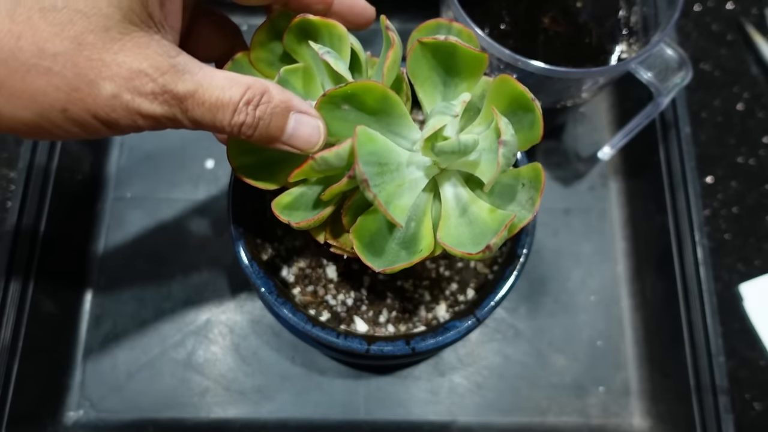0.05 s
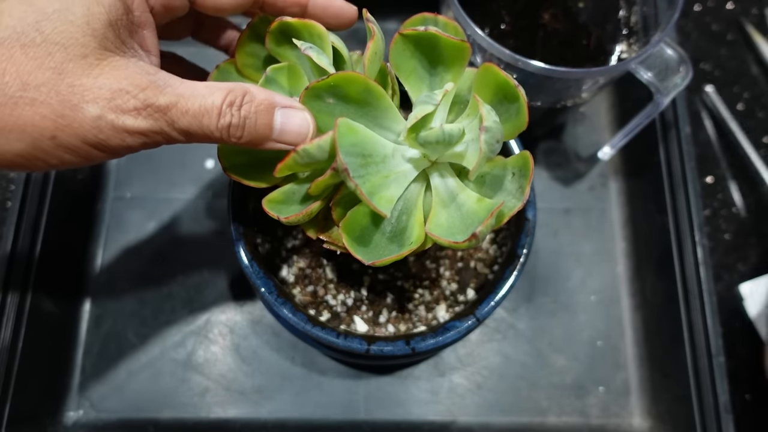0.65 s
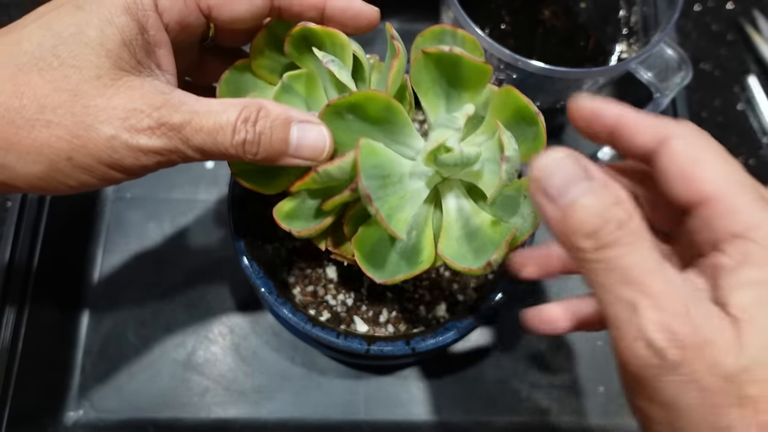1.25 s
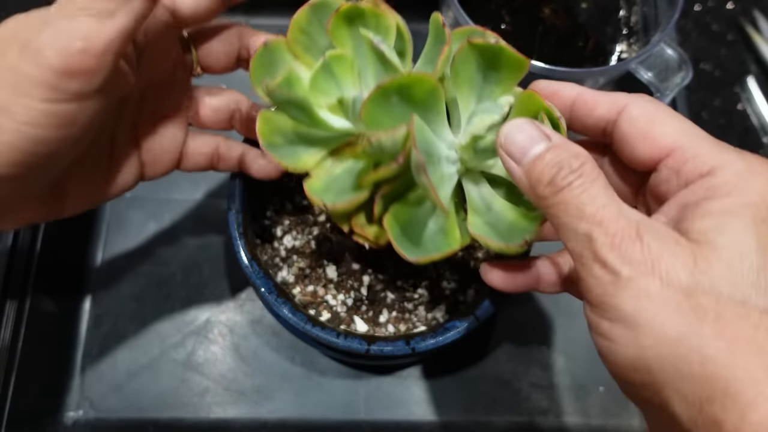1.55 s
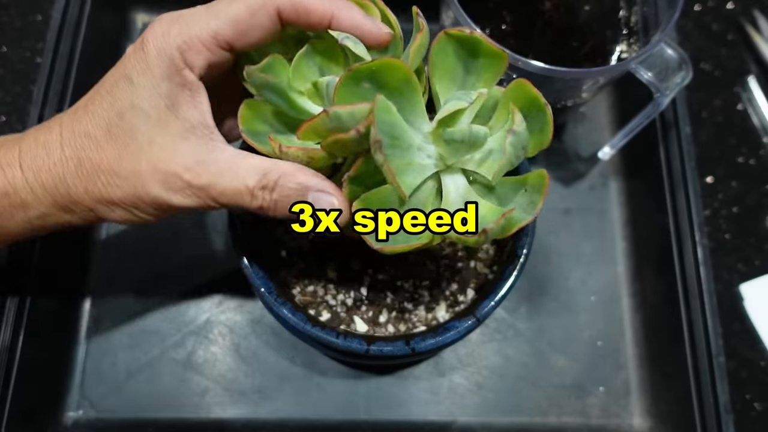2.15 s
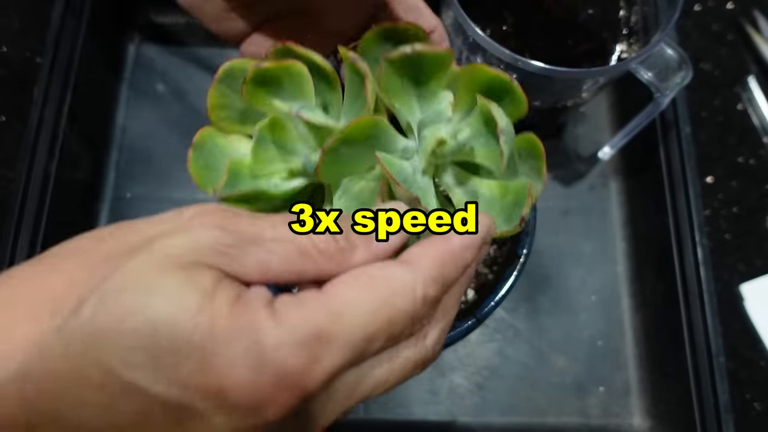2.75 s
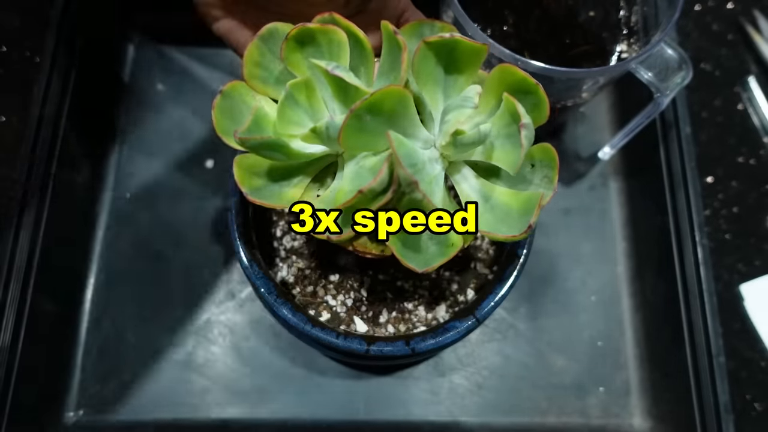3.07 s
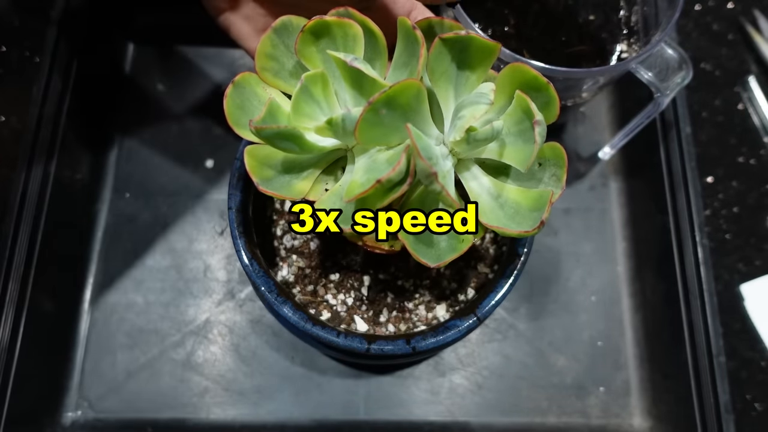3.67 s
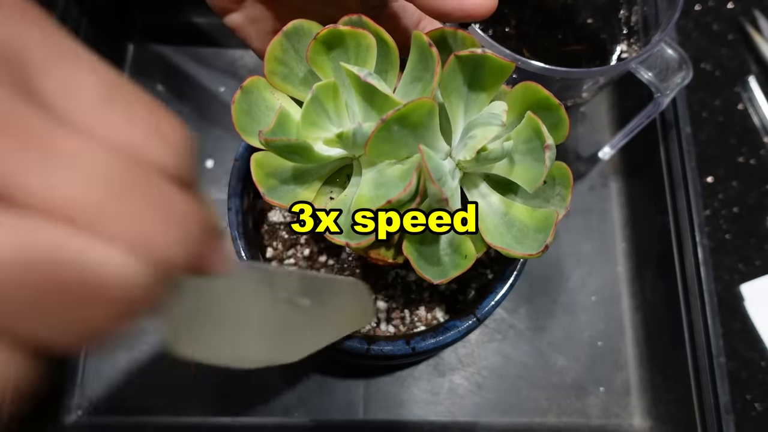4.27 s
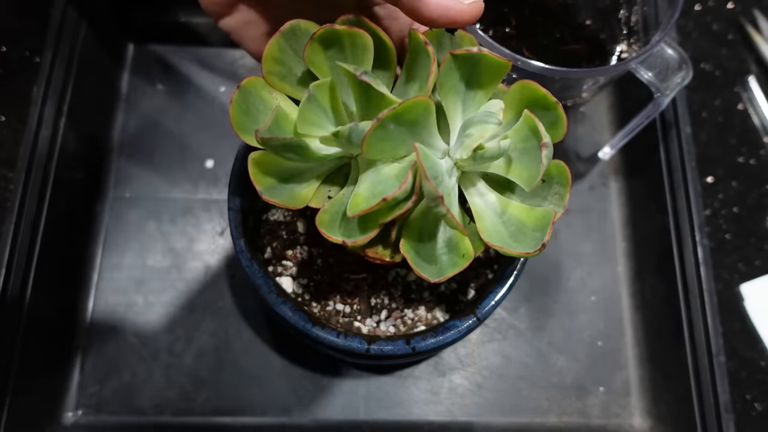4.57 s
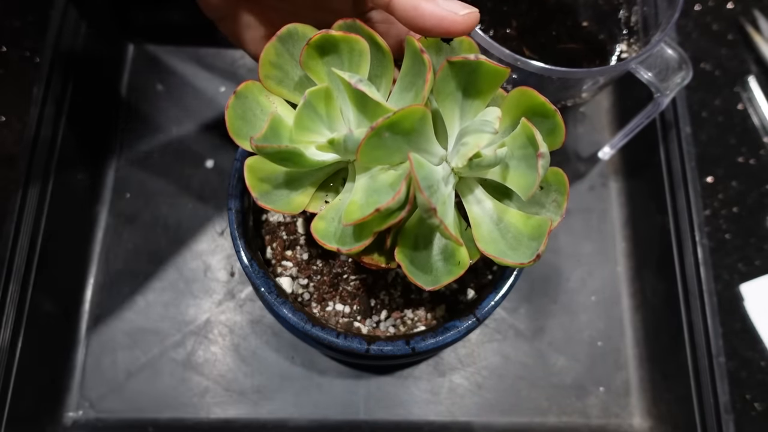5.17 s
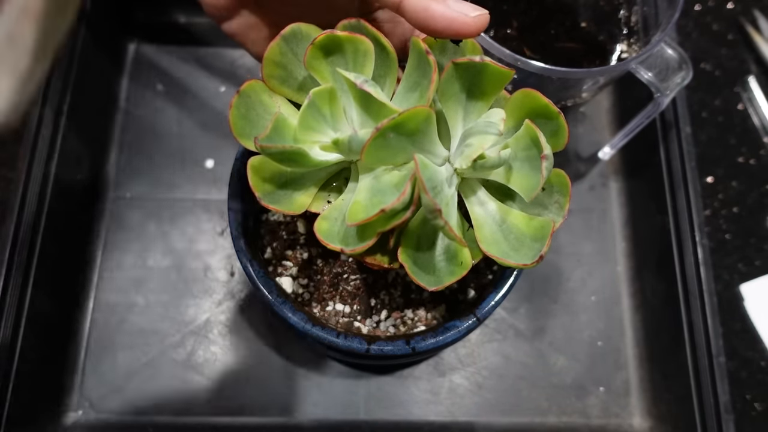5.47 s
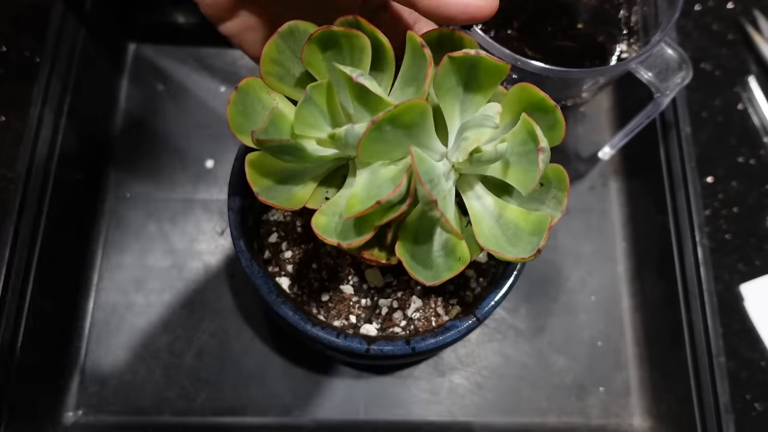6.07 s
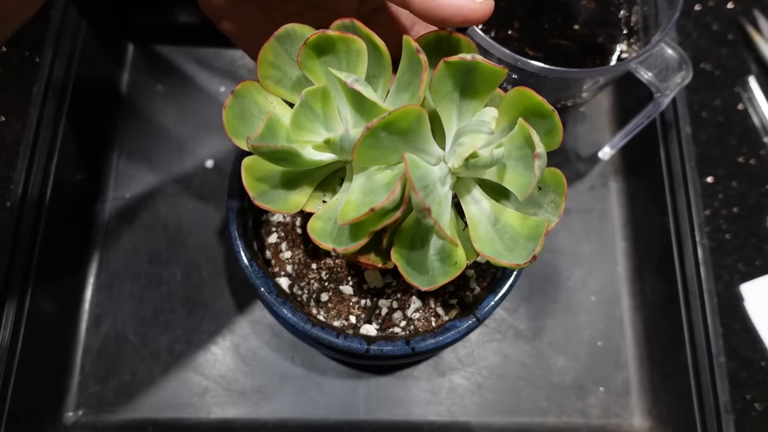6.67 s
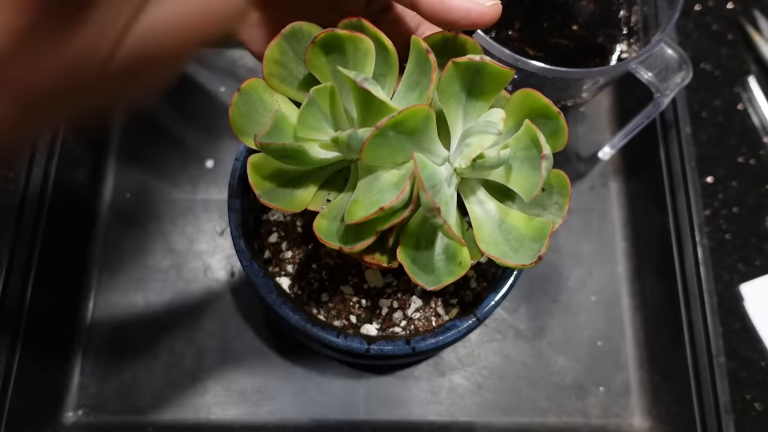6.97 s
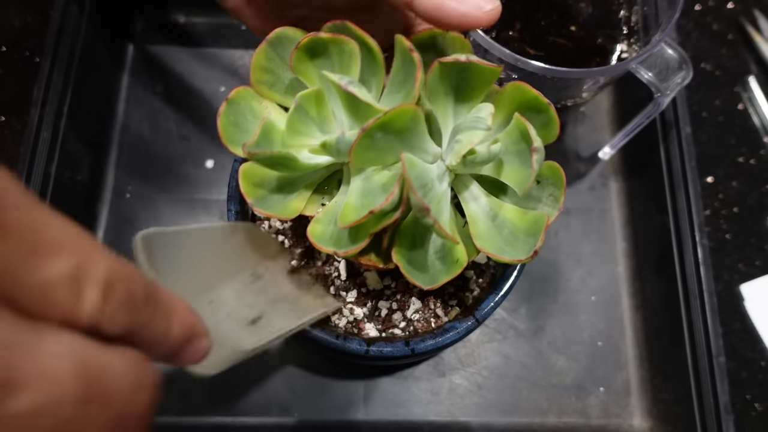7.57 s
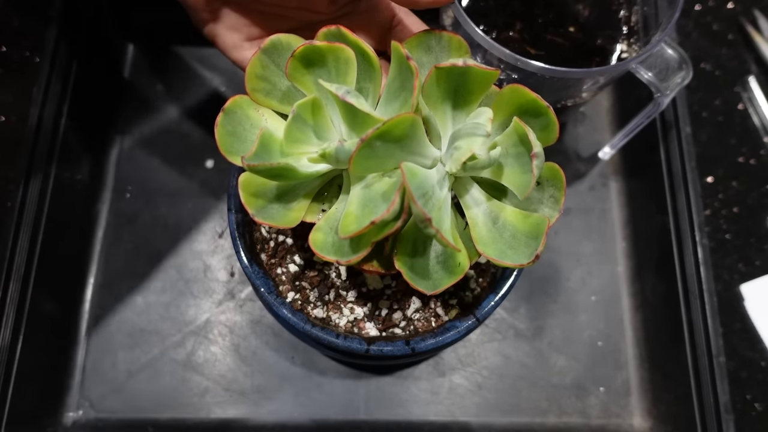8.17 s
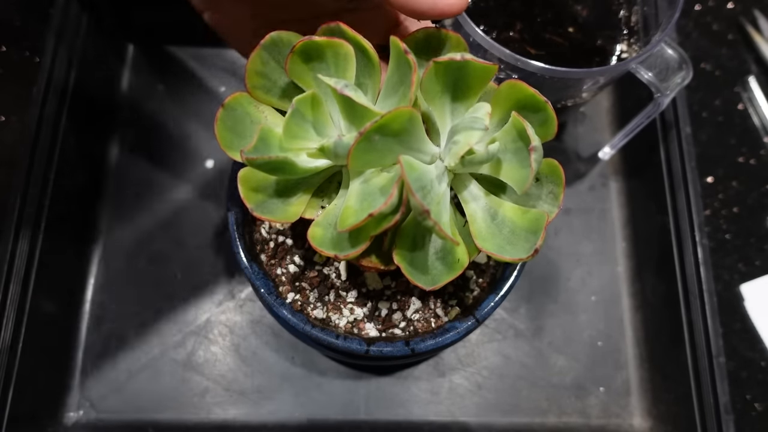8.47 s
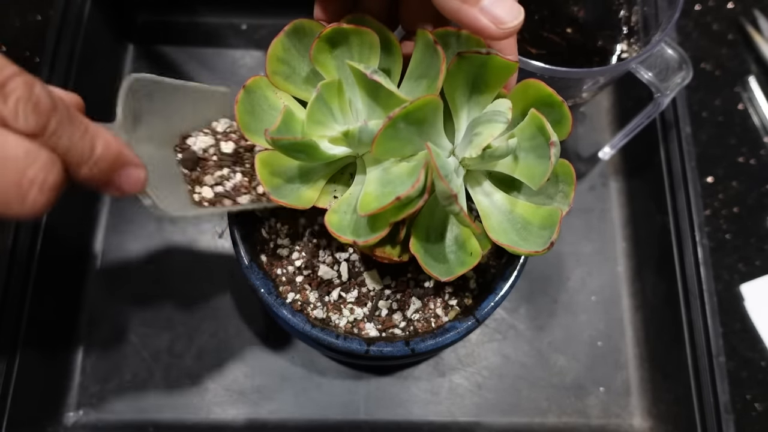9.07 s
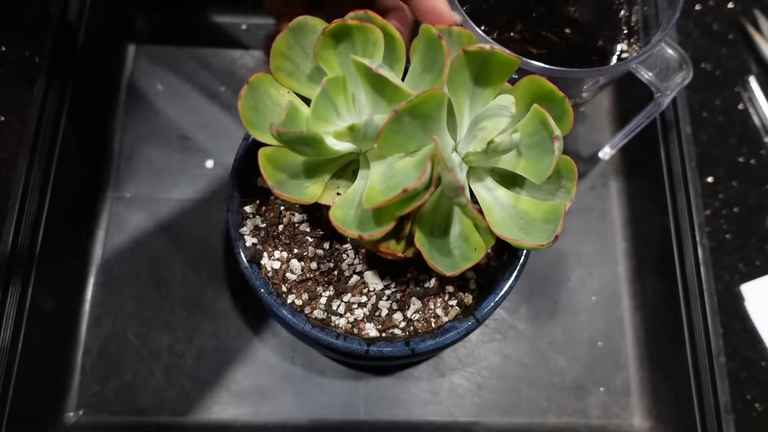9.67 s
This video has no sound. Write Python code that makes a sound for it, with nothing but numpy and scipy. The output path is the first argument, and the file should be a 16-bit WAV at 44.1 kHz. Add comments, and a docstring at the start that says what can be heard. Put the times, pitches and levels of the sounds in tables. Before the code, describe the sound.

Gritty soil is scooped and poured in short bursts, with plastic knocks and ticking stones, after a steel tool chatters on a counter.

```python
"""Kitchen counter, close up: repotting a succulent over quiet room air.
A steel tool is laid down: it clinks, chatters on the hard top and rings out.
Fingers brush the leaves and firm the plant; the pot rocks on its tray.
A plastic scoop knocks, digs gritty mix from a tub and tips it into a glazed pot:
grains ring the scoop's shell, crumbs rain on soil, stones land and skitter."""
import sys
import numpy as np
from scipy import signal
from scipy.fft import rfft, irfft
from scipy.io import wavfile

SR = 44100
rng = np.random.default_rng(int(sys.argv[2]) if len(sys.argv) > 2 else 0)


def dump(signal):
    """Clip the signal to [-1, 1] and save it as 16-bit WAV at the path in sys.argv[1]."""
    limited = np.clip(np.atleast_2d(signal).T, -1, 1)
    pcm = np.round(limited * 32767).astype(np.int16)
    wavfile.write(sys.argv[1], SR, pcm)


N = 437472
T = np.arange(N) / SR

# Table levels are relative, ahead of the mix gains.
# room air spectrum (frequency [Hz], gain [dB])
AIR_EQ = [(30, -26.5), (60, -18.5), (124, -4), (230, 0), (380, -2), (800, -7.5), (1400, -11), (2700, -13.5),
          (5000, -24), (15800, -36.5)]
# broad hums in the air (frequency [Hz], width [Hz], level [dB])
AIR_HUMS = [(218.7, 84, -76.5), (638, 43, -73), (1047.4, 150, -72.5), (1633, 85, -74.5)]
# air envelope (time [s], level [dB])
AIR_LEVELS = [(0, -61.5), (1.35, -55.5), (2.0, -64), (9.92, -64)]
# hiss spectrum (frequency [Hz], gain [dB])
HISS_EQ = [(200, -9), (2500, -6.5), (5000, -4), (8000, -10), (15800, -19.5)]
# tool modes (frequency [Hz], level [dB], free t60 [s], lateness [0 = at once, 1 = as it settles])
STEEL_MODES = [(1233, -55, .3, .7), (1292, -56, .3, .7), (1678, -46, .35, .6), (3228, -38, .3, 0),
               (3698, -50, .25, .2), (5132, -23.5, .2, 1), (5190, -24, .2, 1), (6480, -51, .2, .2),
               (7530, -33, .12, .1), (7598, -25, .2, .15), (9028, -54, .2, .5), (9620, -45, .15, .3),
               (10265, -37, .15, 0), (10375, -30.5, .15, .15), (11499, -50, .2, .3), (13071, -50, .14, .3),
               (13392, -39, .12, .2), (13523, -32, .13, .3), (13997, -52, .15, .3), (14272, -50, .17, .3),
               (14438, -54, .15, .3), (15396, -52, .12, .5)]
# steel striking the counter (time [s], force [dB])
STEEL_BLOWS = [(0.6941, 8), (.707, 9), (.813, -4.5), (.893, 11.5), (0.907, 4), (0.9375, 14), (.976, 11.5),
               (1.009, 13), (1.022, 11.5), (1.03, 4.5), (1.079, 9.5), (1.095, 8), (1.126, 3.5),
               (1.176, 3.5)]
# counter contact spectrum (frequency [Hz], gain [dB])
COUNTER_EQ = [(30, -19.5), (90, -17.5), (190, 2.5), (300, -5.5), (480, 6), (1000, 3.5), (2700, 9),
              (5000, 6), (10000, 3.5), (15500, -16)]
# bumps of tool, clods and pot (time [s], level [dB], pitch [Hz])
SOFT_THUDS = [(0.925, -34, 454), (.94, -25, 900), (2.019, -47, 508), (2.922, -46, 490), (3.283, -29, 618),
              (3.284, -38, 305), (4.63, -48, 506), (4.749, -38, 267), (7.867, -41, 400), (8.021, -49, 236),
              (9.831, -40, 371)]
# fingers on leaves and soil (crest [s], level [dB], rise and fall [s], tilt [dB/oct])
FINGER_RUBS = [(2.329, -67, 0.081, -2), (2.517, -54.5, 0.013, -11.5), (2.67, -63, 0.064, -1),
               (2.799, -61, 0.056, -2), (2.929, -65, 0.024, -3.5)]
# soil spectrum (frequency [Hz], gain [dB])
SOIL_EQ = [(60, -31), (200, -12), (600, -10), (1300, -9), (2400, 0.5), (3500, 0.5), (5000, 1.5),
           (7500, -0.5), (10000, -7), (13000, -12), (15800, -19)]
# clumps bursting around each pour (crest [s], level [dB], tilt [dB/oct], scoop ring [dB])
SOIL_CLUMPS = [(3.175, -42.5, -3, -8), (3.202, -31.5, -2.5, -4.5), (3.303, -31.5, 3, 12),
               (3.41, -35.5, -3.5, -11), (4.584, -30.5, -2.2, -22), (4.632, -32.5, -1, -27),
               (4.873, -43.5, -4, -2), (4.909, -35, -0.1, -28), (5.0, -42.5, 0, -22),
               (5.046, -46, 0.5, -16), (6.232, -39, 3, 3), (6.275, -28, 2, -12), (6.392, -34.5, 0.5, -9),
               (6.531, -43.5, -1, -14), (6.641, -43, .5, -18), (6.719, -48, -2, -8), (7.862, -37, -7, -8),
               (7.901, -27.5, .5, 2), (7.999, -37, 0.5, -22), (8.132, -41, 0, -24), (9.793, -38, 8, 6),
               (9.832, -35.5, -3, -5), (9.88, -37.5, -2, -13)]
# scoopfuls sliding into the pot
# (crest [s], level [dB], rise [s], fall [s], tilt [dB/oct], scoop ring [dB], trickle [dB])
SCOOPFULS = [(3.337, -29, .016, 0.064, .7, -3.5, -65), (4.675, -34.5, 0.033, 0.075, -.3, -29, -51),
             (6.302, -23.5, 0.015, 0.0086, 1, -13, -45.5), (7.95, -27.5, 0.015, 0.016, 3.3, 3, -46.5),
             (9.915, -30.5, 0.01, 0.013, 1, -2, -50)]
# hollow plastic scoop modes (frequency [Hz], width [Hz], gain [dB])
SCOOP_MODES = [(800, 200, -18), (1330, 150, -3), (2070, 110, -4), (2600, 80, -.5), (2850, 80, -9),
               (3350, 100, 2), (3580, 50, -1), (4280, 110, 2.5), (4800, 90, -7), (5210, 160, -6),
               (6170, 200, -7), (7030, 160, -11), (7870, 130, -12), (8640, 130, -14), (9600, 150, -15),
               (10700, 130, -19)]
# scoop shell spectrum (frequency [Hz], gain [dB])
SHELL_EQ = [(200, -17), (700, -5.5), (1300, -3), (4000, 6), (8000, 4.5), (15000, 2.5)]
# large stones landing (time [s], level [dB], pitch [Hz])
STONE_HITS = [(3.2341, -27.5, 4600), (3.327, -27, 4450), (3.6286, -40, 9300), (4.5264, -46, 4000),
              (4.7479, -24.5, 5340), (5.208, -35.5, 5040), (5.908, -31, 3400), (6.438, -44, 6500),
              (7.437, -24.5, 4450), (7.5028, -25.5, 5000), (8.0525, -35.5, 4230), (8.1306, -34.5, 4350),
              (8.9226, -37.5, 5970), (9.071, -45, 5960), (9.158, -29, 4800), (9.19, -33.5, 4900),
              (9.231, -18, 5460), (9.3903, -32, 5900), (9.4248, -32, 6800)]
# stones hopping down the heap (start [s], first level [dB], pitch [Hz], length [s])
STONE_SKITTERS = [(3.601, -38.5, 6370, .22), (5.182, -41, 5430, .18), (6.8346, -41, 6200, .08),
                  (8.304, -37.5, 4960, .16)]
# scoop hitting tub and pot (time [s], level [dB], tilt [dB/oct])
SCOOP_KNOCKS = [(3.2809, -23, -7.5), (4.189, -28, -12), (4.359, -17.5, 0.5), (4.3619, -18, -1),
                (7.322, -34.5, -7.5), (7.470, -26, 0.5), (7.482, -22, -4), (7.533, -39, -2),
                (7.674, -24, 4.5), (7.864, -28.5, -10.5), (8.9692, -20, -6), (9.0211, -23, -4.5),
                (9.157, -34.5, -7), (9.830, -22.5, 0.5)]
# knock spectrum (frequency [Hz], gain [dB])
KNOCK_EQ = [(150, -22), (500, -10), (1200, -2.5), (2400, 5), (4200, 6.5), (7000, 0), (15000, -13)]
# scoop strokes through the tub (entry [s], bite [s], entry [dB], scrape [dB], bite [dB])
DIG_STROKES = [(4.193, 4.363, -43, -39.5, -30), (5.789, 5.938, -40.5, -38, -26.5),
               (7.314, 7.478, -42, -41, -27)]
# bouts of shaking the scoop (first jerk [s], last jerk [s], strongest [s], level [dB], creep [dB])
SCOOP_SHAKES = [(7.535, 7.677, 7.57, -31.5, -41), (8.969, 9.56, 9.27, -34, -48)]
# grit-on-plastic spectrum (frequency [Hz], gain [dB])
SCRAPE_EQ = [(150, -31), (500, -29), (1200, -4), (2500, -17.5), (4500, 10), (7000, -12), (10000, -4),
             (13000, -8.5), (15500, -51)]

SLIDE_CREST_S = .25


def undb(db):
    """dB to gain."""
    return 10 ** (np.asarray(db) / 20)


def unit(x):
    """Scale to rms 1."""
    return x / np.sqrt(np.mean(x ** 2) + 1e-30)


def add(track, at_s, sound):
    """Mix in from at_s."""
    i = max(int(at_s * SR), 0)
    part = sound[:max(N - i, 0)]
    track[i:i + len(part)] += part


def colour(x, points, tilt_db_oct=0, size=2048):
    """Minimum-phase EQ through (Hz, dB) points, tilted about 4 kHz."""
    octave = np.log2(np.maximum(np.fft.rfftfreq(size, 1 / SR), 10))
    hz, db = np.transpose(points)
    db = np.interp(octave, np.log2(hz), db) + tilt_db_oct * np.clip(octave - np.log2(4000), -2, 1.5)
    cepstrum = irfft(np.log(undb(db)))
    cepstrum[1:size // 2] *= 2
    cepstrum[size // 2 + 1:] = 0
    return signal.fftconvolve(x, irfft(np.exp(rfft(cepstrum))))[:len(x)]


def resonate(x, hz, width_hz):
    """One resonance, unity gain at centre."""
    return signal.lfilter(*signal.iirpeak(hz, hz / width_hz, fs=SR), x)


def wobble(rate_hz, size):
    """Random drift, spread near 1."""
    knots = rng.standard_normal(4000)
    return np.interp(np.arange(size) * rate_hz / SR, np.arange(len(knots)), knots)


def grains(per_s, spread_db, size):
    """Tiny random impacts of very unequal strength."""
    hits = rng.random(size) < per_s / SR
    strength = np.minimum(rng.exponential(size=size), 4)
    sign = rng.choice([-1, 1], size)
    return unit(hits * sign * undb(spread_db * strength))


def slide(rise_s, fall_s, per_s, spread_db, straggle_db):
    """Small avalanche: grains swell and die, stragglers trail. Returns signal, envelope rms."""
    t = np.arange(SR * 3 // 4) / SR - SLIDE_CREST_S
    swell = np.exp(-(np.minimum(t, 0) / rise_s) ** 2)
    after_s = np.maximum(t, 0)
    envelope = swell * np.exp(-(after_s / fall_s) ** 1.2)
    stragglers = undb(straggle_db) * swell * np.exp(-after_s / .077) * grains(640, 5, len(t))
    return envelope * grains(per_s, spread_db, len(t)) + stragglers, np.sqrt(np.mean(envelope ** 2))


def room_tone():
    """Quiet air with broad hums, plus steady hiss."""
    def air():
        rumble = undb(-67.5) * unit(colour(rng.standard_normal(N), AIR_EQ, size=8192))
        hums = sum(undb(db) * unit(resonate(rng.standard_normal(N), hz, width_hz))
                   for hz, width_hz, db in AIR_HUMS)
        return unit(rumble + hums)
    times_s, levels_db = np.transpose(AIR_LEVELS)
    hiss = np.array([unit(colour(rng.standard_normal(N), HISS_EQ)) for _ in range(2)])
    mid = air()
    side = undb(-2) * air() * np.array([[1], [-1]])
    return undb(np.interp(T, times_s, levels_db)) * (mid + side) + undb(-70) * hiss


def settling(t):
    """Tool grazes, drops, chatters, lies flat. Returns force, late-mode drive [dB], finger damping."""
    touch_s, drop_s, land_s, flat_s = .705, .9, .97, 1.24
    touched_s, dropped_s = np.maximum(t - touch_s, 0), np.maximum(t - drop_s, 0)
    graze = (t > touch_s) * undb(-12 - 135 * touched_s)
    chatter_db = 1 - 16 * dropped_s - 380 * np.maximum(t - flat_s, 0)
    landing_db = 4.5 * np.exp(-((t - land_s) / .014) ** 2)  # full weight comes down
    force = graze + np.minimum(dropped_s / .014, 1) * undb(chatter_db + landing_db)
    late_db = -14 + 26.5 * np.exp(-((t - 1.163) / .16) ** 2)  # contact travels along the steel
    grip = 1 + 1.8 * np.exp(-touched_s / .39)  # fingers let go; 1 = free
    return force, late_db, grip


def steel_tool():
    """Blows and chatter pump the steel's modes; the counter adds cracks and a dry scrape."""
    t = T[:2 * SR]
    force, late_db, grip = settling(t)
    damped_s = np.cumsum(grip) / SR  # held steel decays faster
    chatter = force * undb(-19 + 2.5 * wobble(110, len(t)))
    blows = np.zeros(len(t))
    for at_s, db in STEEL_BLOWS:
        add(blows, at_s, undb([db]))
    ring = 0
    for hz, db, t60_s, lateness in STEEL_MODES:
        # late modes feed on chatter, barely on blows
        drive = (chatter * undb(lateness * late_db)) ** 2 + (blows * undb(-.5 - 20 * lateness)) ** 2
        power = drive * undb(2 * wobble(35, len(t))) ** 2
        fade = undb(-60 * damped_s / t60_s) ** 2
        energy = fade * np.cumsum(power / fade)
        # contacts nudge the phase
        nudges_rad = .5 * np.sqrt(power / (energy + 1e-18)) * rng.standard_normal(len(t))
        bounce = undb(2 * (1.5 - lateness) * wobble(70, len(t)))
        tone = np.sqrt(2) * np.sin(2 * np.pi * hz * t + np.cumsum(nudges_rad))
        ring = ring + undb(db - 6) * unit(np.sqrt(energy) * bounce) * tone
    crack_t = T[:SR // 8]
    crack_envelope = np.exp(-crack_t / .00099) + undb(-12) * np.exp(-crack_t / .026)
    crack = rng.standard_normal(len(crack_t)) * crack_envelope
    cracks = colour(signal.fftconvolve(blows, crack)[:len(t)], COUNTER_EQ, tilt_db_oct=3.25)
    scrape = colour(chatter * grains(7000, 5.2, len(t)), COUNTER_EQ, tilt_db_oct=-1.43)
    out = np.zeros(N)
    add(out, 0, ring + undb(-45) * unit(cracks) + undb(-46) * unit(scrape))
    return out


def thuds():
    """Soft, quickly damped bumps of tool, clods and pot."""
    out, t = np.zeros(N), T[:SR // 8]
    for at_s, db, hz in SOFT_THUDS + pot_rocking():
        push = rng.standard_normal(len(t)) * np.exp(-t / .0062)
        thud = resonate(resonate(push, hz, .5 * hz), hz, .34 * hz)
        add(out, at_s, undb(db) * thud / np.abs(thud).max())
    return out


def brushing():
    """Skin slides over leaves and soil."""
    out = np.zeros(N)
    for crest_s, db, ramp_s, tilt in FINGER_RUBS:
        rub, rms = slide(ramp_s, ramp_s, per_s=17000, spread_db=5.5, straggle_db=-30)
        add(out, crest_s - SLIDE_CREST_S, undb(db) * rms * unit(colour(rub, SOIL_EQ, tilt)))
    return out


def pot_rocking(from_s=2.55, to_s=2.91, count=5):
    """Pot bumps its tray as the plant is firmed. Rows as SOFT_THUDS."""
    rows = []
    for k, (late, loud, high) in enumerate(rng.random((count, 3))):
        at_s = from_s + (to_s - from_s) * (k + late) / count
        rows.append((at_s, -49.5 + 6 * (loud - .5), 489 * (1 + .17 * (high - .5))))
    return rows


def scoop_ring(push):
    """Plastic shell rings; each contact spot favours other modes."""
    spot_db = 2 * rng.standard_normal(len(SCOOP_MODES))
    return sum((-1) ** k * undb(db + spot_db[k]) * resonate(push, hz, width_hz)
               for k, (hz, width_hz, db) in enumerate(SCOOP_MODES))


def falling_mix():
    """Dry crumbs rain on soil; the scoop's ring adds a rasp near 4 kHz."""
    pours = [row[:-1] for row in SCOOPFULS]
    trickles = [(crest_s, db, .067, .16, -1.2, -15) for crest_s, *_, db in SCOOPFULS]
    clumps = [(crest_s, db, .011, .016, tilt, ring_db) for crest_s, db, tilt, ring_db in SOIL_CLUMPS]
    out = np.zeros(N)
    for crest_s, db, rise_s, fall_s, tilt, ring_db in pours + trickles + clumps:
        grit, rms = slide(rise_s, fall_s, per_s=8000, spread_db=3, straggle_db=-17)
        soil = unit(colour(grit, SOIL_EQ, tilt))
        shell = undb(ring_db) * unit(colour(scoop_ring(grit), SHELL_EQ, tilt))
        add(out, crest_s - SLIDE_CREST_S, undb(db) * rms * unit(soil + shell))
    rasp = undb(-3.5) * resonate(out, hz=4040, width_hz=470)
    return out + rasp


def stone_hops(hop_s=.032, fade_db_per_s=71):
    """Stones skitter down the heap in uneven, weakening hops. Rows as STONE_HITS."""
    rows = []
    for start_s, db, hz, length_s in STONE_SKITTERS:
        count = max(round(length_s / hop_s), 1)
        for k, (late, loud, high) in enumerate(rng.standard_normal((count, 3))):
            after_s = hop_s * (k + .3 * late * (k > 0))
            hop_db = db - fade_db_per_s * after_s + .5 * loud
            rows.append((start_s + after_s, hop_db, hz * np.exp(.1 * high)))
    return rows


def stones():
    """Each stone lands with a short, gritty tick and sheds dust."""
    out, t = np.zeros(N), T[:SR // 10]
    attack = (1 - np.exp(-t / .0006)) ** 2
    envelope = attack * (np.exp(-t / .00063) + undb(-24) * np.exp(-t / .013))
    for at_s, db, hz in STONE_HITS + stone_hops():
        burst = rng.standard_normal(len(t)) * envelope
        tick = resonate(resonate(burst, hz, .9 * min(hz, 9000)), hz, SR / 5)
        add(out, at_s + .000982, undb(db) * tick / np.abs(tick).max())
    return out


def knocks():
    """Hard taps of the hand-damped scoop on tub and pot."""
    out, t = np.zeros(N), T[:SR // 6]
    for at_s, db, tilt in SCOOP_KNOCKS:
        push = signal.unit_impulse(len(t)) + .31 * rng.standard_normal(len(t)) * np.exp(-t / .0018)
        knock = colour(push + undb(15.5) * scoop_ring(push), KNOCK_EQ, tilt)
        add(out, at_s, undb(db) * knock / np.abs(knock).max())
    return out


def scoop_moves(swing_s=.067, fade_db_per_s=60):
    """Strokes and shakes shift grit (crest [s], level [dB], rise [s], fall [s], tilt [dB/oct])."""
    moves = []
    for entry_s, bite_s, entry_db, scrape_db, bite_db in DIG_STROKES:
        moves.append((entry_s, entry_db, .015, .018, -11))
        moves.append((entry_s + .56 * (bite_s - entry_s), scrape_db, .04, .05, 1.5))
        moves.append((bite_s, bite_db, .015, .014, -3))  # into packed mix
    for first_s, last_s, strongest_s, db, creep_db in SCOOP_SHAKES:
        for jerk_s in np.linspace(first_s, last_s, round((last_s - first_s) / swing_s) + 1):
            moves.append((jerk_s, db - fade_db_per_s * abs(jerk_s - strongest_s), .011, .013, 2))
        half_s = (last_s - first_s) / 2
        moves.append((first_s + .5 * half_s, creep_db, .5 * half_s, .74 * half_s, 2.2))  # between jerks
    return moves


def digging():
    """Grit scrapes along the scoop and rings its shell."""
    out = np.zeros(N)
    for crest_s, db, rise_s, fall_s, tilt in scoop_moves():
        grit, rms = slide(rise_s, fall_s, per_s=5400, spread_db=4.5, straggle_db=-34.5)
        shell = unit(colour(scoop_ring(grit), SHELL_EQ, tilt))
        scrape = undb(-13) * unit(colour(grit, SCRAPE_EQ, tilt))
        add(out, crest_s - SLIDE_CREST_S, undb(db) * rms * unit(shell + scrape))
    return out


def kitchen(x, early_db, tail_db, low_t60_s):
    """Side reflections off tray and counter, then a short tail, 1.3x longer above 7 kHz."""
    t = T[:SR * 3 // 4]
    split = signal.butter(2, 7000, fs=SR)
    early = undb(early_db) * unit(rng.standard_normal(len(t)) * (t > .0004) * np.exp(-t / .005))
    ears = []
    for side in (1, -1):
        low, high = rng.standard_normal((2, len(t)))
        low = signal.lfilter(*split, low) * undb(-60 * t / low_t60_s)
        high = (high - signal.filtfilt(*split, high)) * undb(-60 * t / (1.3 * low_t60_s))
        tail = undb(tail_db) * unit((t > .006) * (low + high))
        echo = (side * early + tail) / np.sqrt(len(t))
        ears.append(x + signal.fftconvolve(x, echo)[:N])
    return np.array(ears)


def scene():
    """Tool, scoop and soil in one small room, stereo."""
    potting = (undb(-.5) * digging() + undb(-1.88) * falling_mix() + undb(1.5) * brushing()
               + undb(2) * knocks() + undb(4) * stones() + undb(-2.5) * thuds())
    tool = kitchen(steel_tool(), early_db=-17.5, tail_db=-12.5, low_t60_s=.41)
    pan_db = .3 + 1.1 * wobble(25, N)  # crumbs land to either side
    potting = kitchen(potting, early_db=-7.5, tail_db=-17, low_t60_s=.083)
    return tool * undb([[-.7], [.7]]) + potting * undb([pan_db, -pan_db]) + room_tone()


def record(dry, bass_hz=60, top_hz=15750):
    """Gentle bass roll-off, steep top cut."""
    thin = signal.sosfilt(signal.butter(1, bass_hz, "high", fs=SR, output="sos"), dry)
    return signal.sosfilt(signal.ellip(10, .2, 80, top_hz, fs=SR, output="sos"), thin)


dry = scene()
out = record(dry)
dump(out)
```